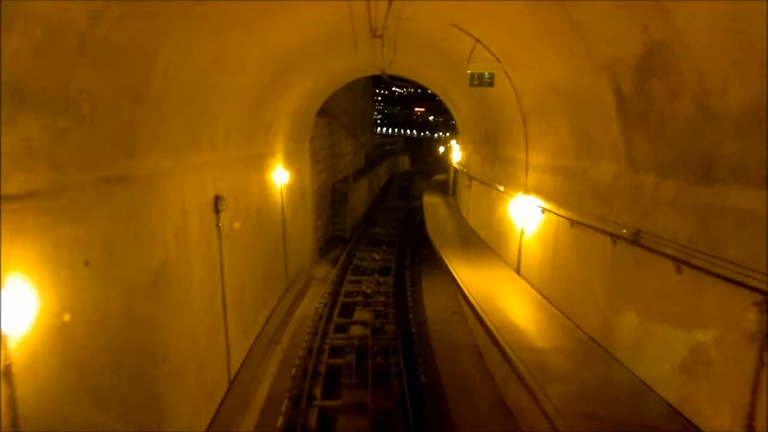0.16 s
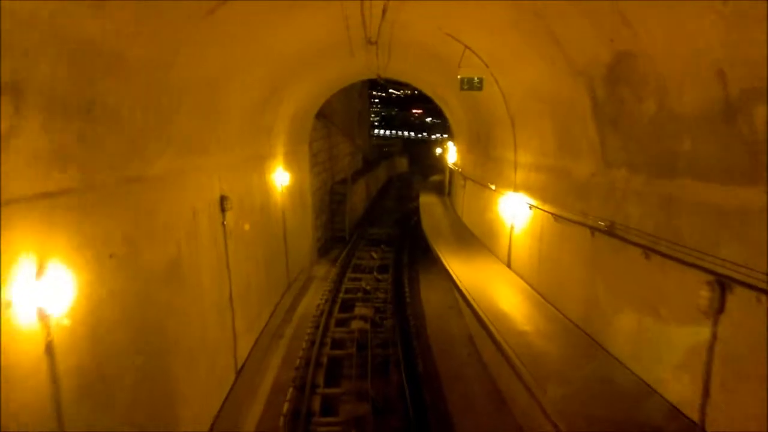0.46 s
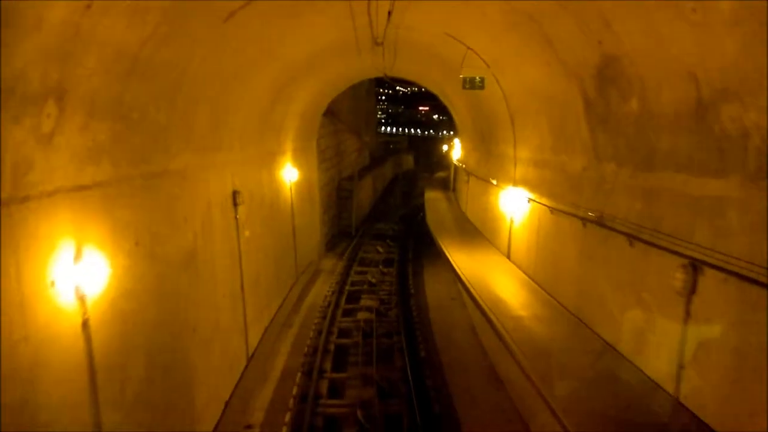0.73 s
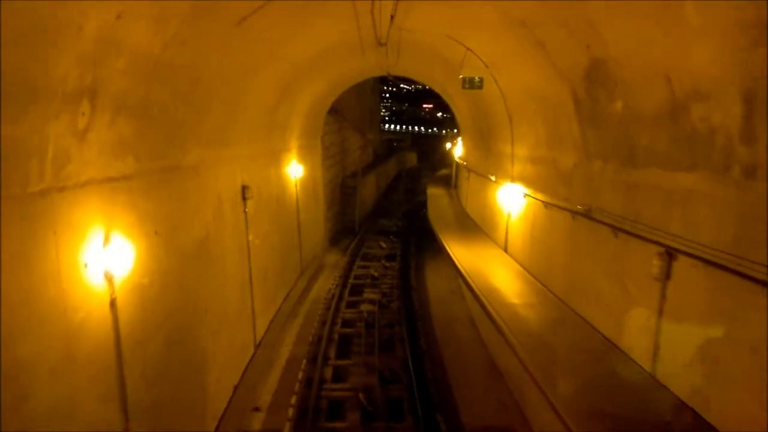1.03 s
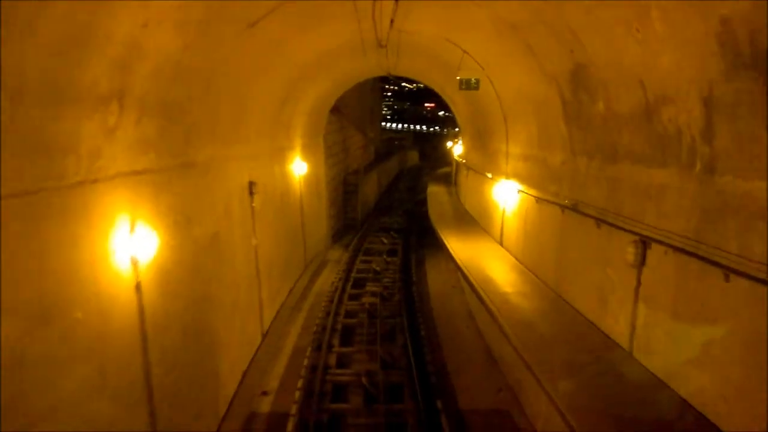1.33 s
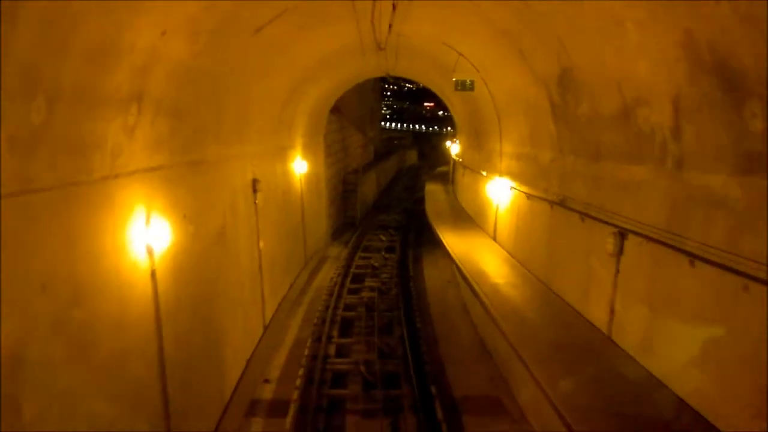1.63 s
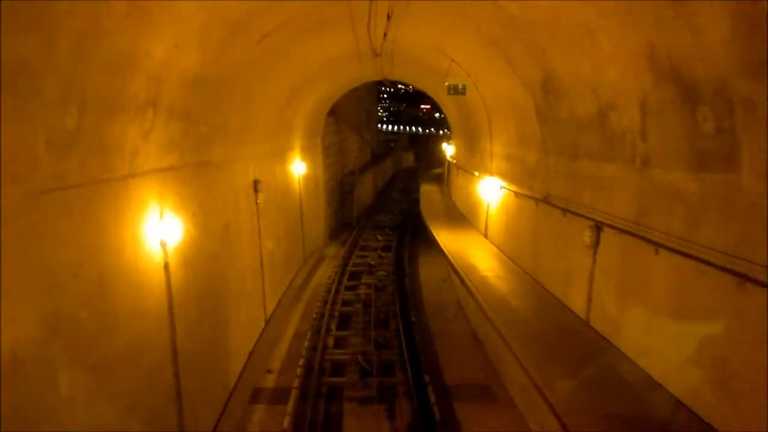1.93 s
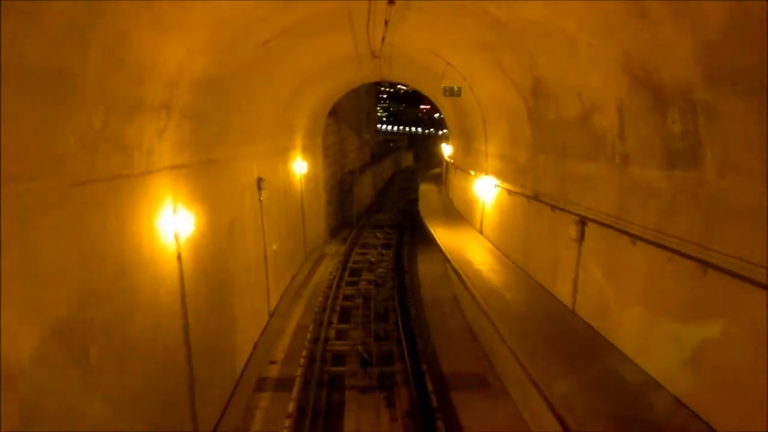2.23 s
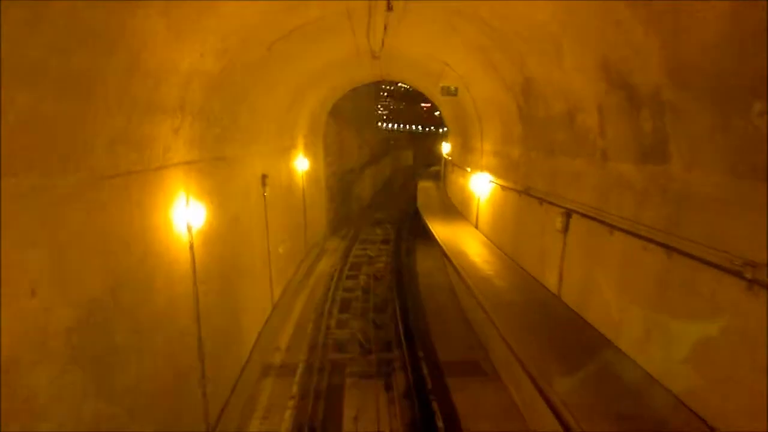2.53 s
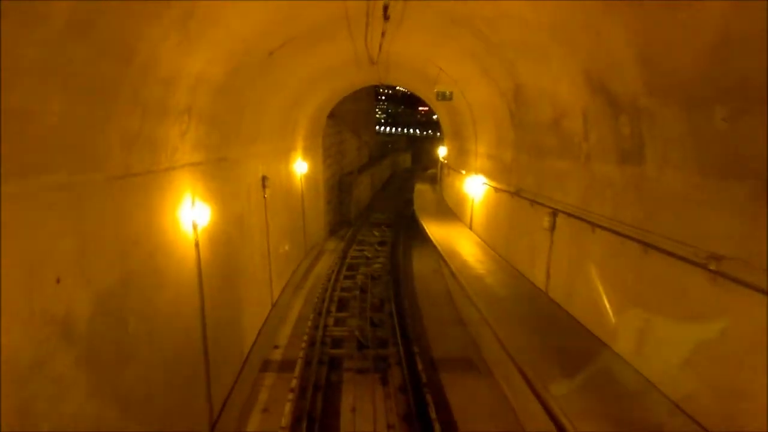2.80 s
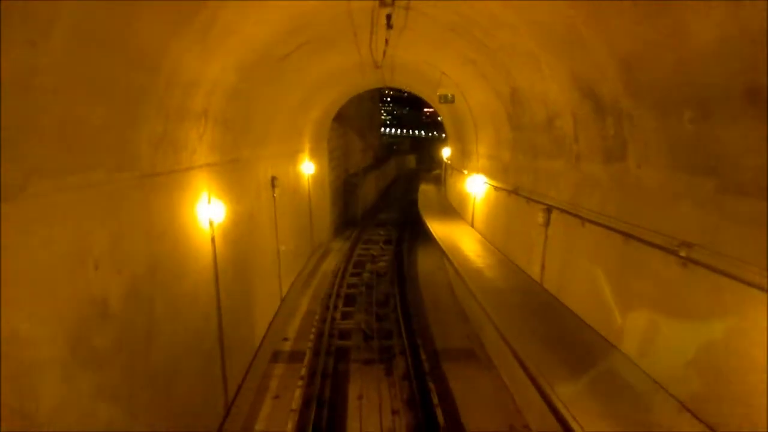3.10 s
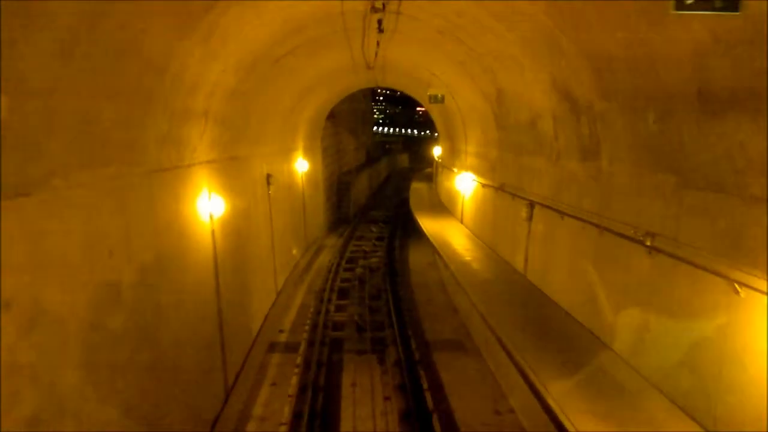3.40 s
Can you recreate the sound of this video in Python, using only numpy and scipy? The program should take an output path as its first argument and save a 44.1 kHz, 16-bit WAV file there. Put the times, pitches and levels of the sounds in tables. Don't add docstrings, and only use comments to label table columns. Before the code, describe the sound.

Low rumbling of a rail car rolling in a tunnel, floor thudding, faint latch ticking once

```python
import sys
import numpy as np
from scipy import signal
from scipy.io import wavfile
from scipy.ndimage import uniform_filter1d

SR = 44100
rng = np.random.default_rng(int(sys.argv[2]) if len(sys.argv) > 2 else 0)


def materialize(psi):
    bounded = np.clip(np.atleast_2d(psi).T, -1, 1)
    quanta = np.round(bounded * 32767).astype(np.int16)
    wavfile.write(sys.argv[1], SR, quanta)


def invert_db(level):
    return 10 ** (np.asarray(level, dtype=float) / 20)


N = 156555
T = np.arange(N) / SR

# freq_hz, likeness (0 to 1)
PORT_LIKENESS = [(60, 0.9), (250, 1), (450, 0.9), (800, 0.79), (1430, 0.49), (2700, 0.16), (5100, 0.13),
                 (9000, 0.13)]
# freq_hz, left_over_right_db
PORT_BALANCE = [(60, 1.5), (150, -4), (300, -2.5), (600, -3), (1300, -0.5), (2600, -6.5), (4500, 0.1),
                (8000, 12)]
# freq_hz, left_lead_rad
PORT_PHASE = [(30, 0), (500, 0), (1290, -.59), (1890, -2), (2500, 4), (3010, 8.8), (3880, 12.5), (5250, 15)]
# freq_hz, density_db (per Hz)
SHEEN_TONE = [(7500, -28), (9500, 1.5), (11500, -6.5), (12300, -18.5), (15500, -30.5)]
# freq_hz, density_db (per Hz)
AIR_TONE = [(4500, -17), (5800, -2.5), (7000, -2), (8500, -6.5), (10000, -10.5), (12000, -42.5)]
# freq_hz, density_db (per Hz)
HISS_TONE = [(1700, -40), (2450, -12.5), (2800, -5), (3900, -2.5), (4500, -5.5), (5620, -13), (5800, -27),
             (6500, -52.5)]
# freq_hz, density_db (per Hz)
ROLL_TONE = [(26, -40), (46, -23.5), (110, -6.5), (300, -12), (800, -21), (1500, -29), (2400, -37),
             (3000, -71.5)]
# time_s, load_db
WHEEL_LOAD = [(0.05, -41.5), (1.17, -46.5), (1.74, -42), (2.16, -45.5), (2.73, -39.5), (2.78, -41),
              (3.47, -43.5), (3.48, -47), (3.5, -43)]
# start_s, peak_db, left_over_right_db, loudest_mode_hz
LATCH_TICKS = [
    (.6435, -57.5, .6, 5346),
    (.656, -58, 0, 4000),
    (.6625, -59.5, -1.5, 6900),
    (.669, -59, 0, 3800),
    (.679, -63, 0, 6650),
    (1.305, -68, 3.5, 6650),
    (1.33, -69, 2, 6650),
]
# pitch_hz, level_db, t60_s
LATCH_MODES = [(4250, 0, .09), (5346, 0, .09), (6650, -4, .09), (7736, -10, .05), (9986, -12, .03)]
# start_s, level_db, t60_s
LATCH_RATTLES = [
    (.55, -61, .5),
    (.642, -59.5, 0.26),
    (.655, -58.5, .5),
    (0.821, -68.5, 0.46),
    (1.3, -62, .5),
    (2.42, -71, 0.95),
    (2.839, -68, 0.53),
]
# freq_hz, density_db (per Hz)
CHATTER_TONE = [(2800, -14), (3800, 0), (5400, -6), (6600, -11), (8200, -20), (11000, -29), (14000, -52)]
# pitch_hz, width_hz, level_db, left_over_right_db
FRAME_MODES = [(615, 9, -59.5, 5.5), (729, 39, -54.5, 4), (875, 37, -57.5, -1.5), (932, 19, -56, -3),
               (1256, 28, -60, 3), (978, 13, -65, 0), (1344, 16, -66, 1), (1720, 13, -66, 0.5),
               (2080, 36, -64.5, -9), (2213, 110, -62, -6), (2752, 80, -72, -10), (3190, 39, -68.5, -0.3),
               (3870, 1100, -76, 0)]
# pitch_hz, width_hz, level_db, left_over_right_db
PANEL_MODES = [(50, 14, -39, -5), (85, 25.6, -35.5, -5), (134.5, 15, -40.5, -4.5), (148.5, 11, -44, -6),
               (181.5, 7, -45.5, -5.5), (215, 12, -40.5, -2.5), (247.3, 14, -46, -6.5),
               (263.5, 7.5, -43, -1.5), (319.7, 11.8, -44.5, -1), (353.3, 21, -52, -4.5),
               (387.5, 7.7, -50, -2.5), (441, 21, -52, 0.5), (504.3, 35, -50, -0.5), (569, 16, -58, -5.5)]
# top_s, level_db, pitch_hz, length_s
FRAME_SINGS = [(0.11, -59.5, 2077, 0.05), (0.28, -55.5, 2067, 0.061), (0.57, -48.5, 933, 0.17),
               (0.58, -66.5, 2060, 0.072), (0.7, -59, 2070, 0.08), (1.75, -64, 2077, 0.13),
               (1.98, -65, 2070, 0.055), (2.11, -48.5, 920, 0.065), (2.29, -49, 928, 0.074),
               (2.45, -49, 907, 0.05), (2.56, -45.5, 928, 0.093), (2.63, -64, 2100, 0.05),
               (2.71, -53, 898, 0.07), (2.83, -56, 2070, 0.062), (2.93, -47.5, 932, 0.1),
               (3.03, -57.5, 2074, 0.07), (3.15, -49, 932, 0.05), (3.33, -64, 2090, 0.07),
               (3.38, -52.0, 927, 0.13)]
# top_s, level_db, pitch_hz, length_s
PANEL_KNOCKS = [(0.07, -39.0, 328, 0.034), (0.2, -32, 137, 0.037), (0.23, -35.5, 315.5, 0.041),
                (0.24, -35, 230, 0.068), (0.36, -30.5, 134, 0.053), (0.38, -35.5, 238, 0.06),
                (0.45, -35, 318, 0.042), (0.61, -29.5, 129, 0.031), (0.69, -30, 245, 0.039),
                (0.75, -39.3, 309.5, 0.044), (0.75, -29.5, 139.5, 0.072), (1.02, -33, 222, 0.039),
                (1.46, -30.5, 210.3, 0.072), (1.52, -33, 136, 0.08), (1.55, -37, 323, 0.055),
                (1.78, -31.8, 139.6, 0.19), (1.85, -30, 229, 0.056), (1.95, -28.5, 239, 0.04),
                (2.01, -33.6, 137.3, 0.13), (2.06, -36, 221, 0.043), (2.29, -29.5, 223.4, 0.042),
                (2.52, -37, 332, 0.04), (2.56, -30, 233.3, 0.04), (2.59, -31.4, 142, 0.06),
                (2.61, -37.5, 333.5, 0.06), (2.69, -40, 142, 0.05), (2.76, -38, 317.6, 0.077),
                (2.91, -36, 317, 0.085), (2.94, -33.5, 253, 0.057), (3.06, -35.5, 129, 0.13),
                (3.08, -31.5, 241, 0.046), (3.14, -40, 315, 0.038), (3.2, -35, 245, 0.088),
                (3.2, -37, 136.2, 0.17), (3.27, -37, 318, 0.06), (3.33, -30.5, 243.5, 0.11),
                (3.34, -34.5, 131, 0.085), (3.44, -36, 240, 0.042), (3.46, -34, 309, 0.033),
                (3.47, -34.2, 132, 0.05)]
# top_s, level_db, pitch_hz, length_s
CAR_SWAYS = [(.2, -27.5, 59.7, .1), (.35, -36.5, 45, 0.07), (.59, -24, 62.1, .1), (.69, -28.5, 47.6, 0.12),
             (.89, -32, 53.5, 0.079), (1.32, -41, 55, 0.093), (1.51, -34, 57.7, .1), (1.63, -45, 50, 0.068),
             (1.76, -34.5, 55, .1), (2.08, -31, 54.6, 0.12), (2.22, -32, 54.4, 0.14),
             (2.65, -35.5, 44.6, 0.19), (2.9, -31, 45.3, 0.17), (3.05, -29, 48.2, 0.16)]
# top_s, level_db, pitch_hz, length_s
FLOOR_JOLTS = [(.07, -26, 89.1, 0.11), (.2, -22, 87.4, 0.11), (.35, -23.5, 85.7, .1),
               (.47, -30, 82.5, 0.11), (.61, -20.5, 79.9, 0.12), (.74, -28, 95.7, 0.15),
               (.89, -27, 91.9, .08), (1.02, -22, 88.3, .14), (1.14, -26, 88, 0.21), (1.37, -32, 89.7, .1),
               (1.5, -32, 87, 0.11), (2.27, -43.5, 85, 0.064), (1.75, -25, 85, 0.1),
               (1.86, -24, 86.67, 0.15), (2.0, -26.5, 81.2, .14), (2.54, -32, 78.63, 0.076),
               (2.67, -29.5, 75, 0.092), (2.84, -28, 78.9, .07), (2.92, -25.5, 73.92, 0.087),
               (3.18, -19, 92.04, .1), (3.25, -21.5, 89.1, 0.18), (3.41, -26.5, 87.43, 0.23),
               (3.53, -20, 85, 0.13)]

NARROW = 0.82


def evened(x):
    return x / np.sqrt(np.mean(x ** 2) + 1e-20)


def read(points, hz):
    freq_hz, value = np.transpose(points)
    return np.interp(np.log(hz + 1), np.log(freq_hz + 1), value)


def sides(pan_db):
    return invert_db([[pan_db / 2], [-pan_db / 2]])


def wander(top_hz):
    hz = np.geomspace(top_hz / 20, top_hz, num=20)[:, None]
    coarse_t = T[::256]
    sines = np.sin(2 * np.pi * (hz * coarse_t + rng.random(hz.shape)))
    return np.interp(T, coarse_t, evened((sines / np.sqrt(hz)).sum(0)))


def heard_by_ports(first, second, hz):
    same = np.clip(read(PORT_LIKENESS, hz), -1, 1)
    left = first * np.exp(1j * read(PORT_PHASE, hz))
    return np.array([left, same * first + np.sqrt(1 - same ** 2) * second])


def wash(tone, patchy_db, size=1024):
    frames = 4 * N // size + 5
    hz = np.fft.rfftfreq(size, 1 / SR)
    a, b, c, d, patches = rng.standard_normal((frames, len(hz), 5)).T
    patches = uniform_filter1d(patches, size=10, axis=0)
    patches = evened(uniform_filter1d(patches, size=12, axis=1))
    spectra = heard_by_ports(a + 1j * b, c + 1j * d, hz[:, None])
    spectra *= invert_db(read(tone, hz)[:, None] + patchy_db * patches)
    spectra *= invert_db(np.outer([.5, -.5], read(PORT_BALANCE, hz)))[..., None]
    noise = signal.istft(spectra, nperseg=size, noverlap=size * 3 // 4)[1]
    return evened(noise[:, :N])


def rushing_air(load_db, shaken):
    duck_db = -4.5 * np.maximum(shaken, -.4)
    air_db = -76 + .3 * load_db + 0.24 * duck_db + .6 * wander(top_hz=15)
    sheen_db = -88.5 + duck_db + 1.1 * wander(top_hz=25)
    return invert_db(air_db) * wash(AIR_TONE, patchy_db=1.5) + invert_db(sheen_db) * wash(SHEEN_TONE, patchy_db=4.5)


def wheel_hiss(load_db, turn_db):
    level_db = -56 + 0.29 * load_db + turn_db + 0.37 * wander(top_hz=22.2)
    return invert_db(level_db) * wash(HISS_TONE, patchy_db=1.73, size=512)


def rolling_rumble(load_db):
    return invert_db(-38.5 + 0.63 * load_db) * wash(ROLL_TONE, patchy_db=1.0, size=2048)


def latch_ticks():
    out, t = np.zeros((2, N)), T[:6000]
    for start_s, peak_db, pan_db, loudest_hz in LATCH_TICKS:
        ring = np.zeros(len(t))
        for hz, mode_db, t60_s in LATCH_MODES:
            level_db = mode_db - 13 * abs(np.log2(hz / loudest_hz))
            detune = rng.uniform(.99, 1.005)
            ring += invert_db(level_db - 60 * t / t60_s) * np.sin(2 * np.pi * hz * detune * t)
        attack = np.minimum(t / .0008, 1)
        out[:, round(start_s * SR):][:, :len(t)] += invert_db(peak_db) * sides(pan_db) * ring * attack
    return out


def latch_rattle():
    shake = np.zeros(N)
    for start_s, level_db, t60_s in LATCH_RATTLES:
        t = T - start_s
        shake += invert_db(level_db - 60 * np.maximum(t, 0) / t60_s) * np.clip(t / 0.015, 0, 1)
    flutter = invert_db(1.1 * wander(top_hz=152))
    return shake * flutter * wash(CHATTER_TONE, patchy_db=-1.0, size=256)


def ringing(modes):
    out = np.zeros((2, N))
    for hz, width_hz, level_db, pan_db in modes:
        r = np.exp(-np.pi * width_hz * 1.5 / SR)
        noise = rng.standard_normal((2, N + SR)) + 1j * rng.standard_normal((2, N + SR))
        envelope = signal.lfilter([1], np.convolve([1, -r], [1, -r]), noise)[:, SR:]
        ports = heard_by_ports(envelope[0], envelope[1], hz)
        tone = evened((ports * np.exp(2j * np.pi * hz * T)).real)
        out += invert_db(level_db + .6 * wander(top_hz=9)) * sides(pan_db) * tone
    return out


def ringing_body(load_db, turn_db, shaken):
    panels = invert_db(0.22 * load_db + 0.37 * shaken) * ringing(PANEL_MODES)
    frame = invert_db(1.2 * load_db + 0.43 * turn_db) * ringing(FRAME_MODES)
    return panels + frame


def flares(events, stretch, trim_db):
    out = np.zeros((2, N))
    for top_s, level_db, hz, length_s in events:
        near = slice(max(round((top_s - .4) * SR), 0), round((top_s + .6) * SR))
        t = T[near] - top_s
        swell = np.exp(-(t / length_s / stretch / NARROW / np.where(t < 0, .45, .55)) ** 2)
        lead = np.array([[read(PORT_PHASE, hz)], [0]])
        tone = np.sqrt(2) * np.cos(2 * np.pi * (hz * t + rng.random()) + lead)
        out[:, near] += invert_db(level_db + trim_db) * sides(read(PORT_BALANCE, hz)) * swell * tone
    return out


def booms(bumps):
    out, skew = np.zeros(N), 0.43
    mean_hz = np.mean(np.transpose(bumps)[2])
    for top_s, level_db, hz, length_s in bumps:
        t = T - top_s
        swell = np.exp(-(t / length_s / NARROW / np.where(t < 0, skew, 1 - skew)) ** 2)
        cycles = hz * t + mean_hz * top_s + 0.19 * rng.random()
        out += invert_db(level_db - 0.1) * np.sqrt(2) * swell * np.cos(2 * np.pi * cycles)
    return out * sides(pan_db=-4)


def scene():
    load_db = np.interp(T, *np.transpose(WHEEL_LOAD))
    load_db = load_db - load_db.mean()
    turns_per_s, turn_top_s = 3.253, 0.038
    turn_db = 0.8 * np.cos(2 * np.pi * turns_per_s * (T - turn_top_s))
    booming = booms(FLOOR_JOLTS) + booms(CAR_SWAYS)
    shaken = uniform_filter1d(abs(booming[1]), size=1500)
    shaken = evened(shaken - shaken.mean())

    mix = rushing_air(load_db, shaken) + wheel_hiss(load_db, turn_db) + rolling_rumble(load_db)
    mix += latch_ticks() + latch_rattle()
    mix += ringing_body(load_db, turn_db, shaken)
    mix += flares(FRAME_SINGS, stretch=1.9, trim_db=-3)
    mix += flares(PANEL_KNOCKS, stretch=1.83, trim_db=-2.5)
    return mix + booming


def top_cut(x):
    return signal.sosfilt(signal.butter(12, 15100, fs=SR, output="sos"), x)


def record(dry):
    ceiling = .7
    limited = ceiling * np.tanh(dry / ceiling)
    return top_cut(limited)


dry = scene()
out = record(dry)
materialize(out)
```